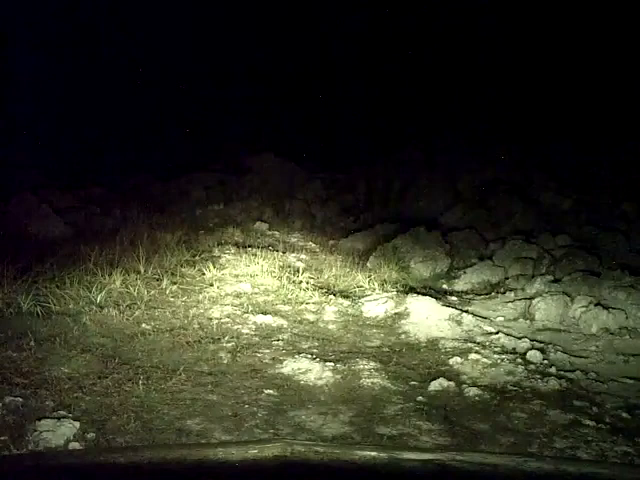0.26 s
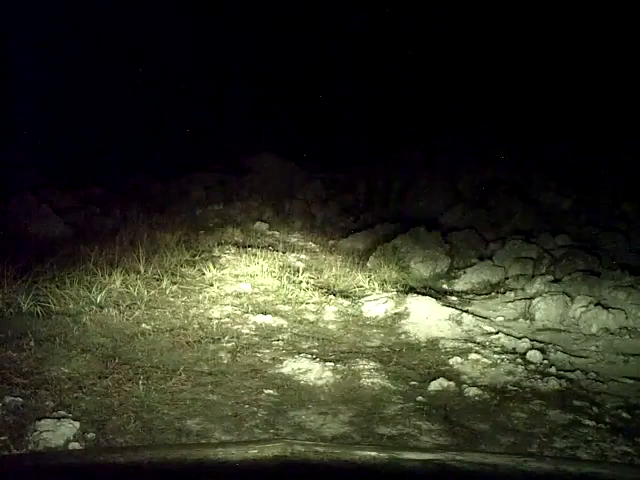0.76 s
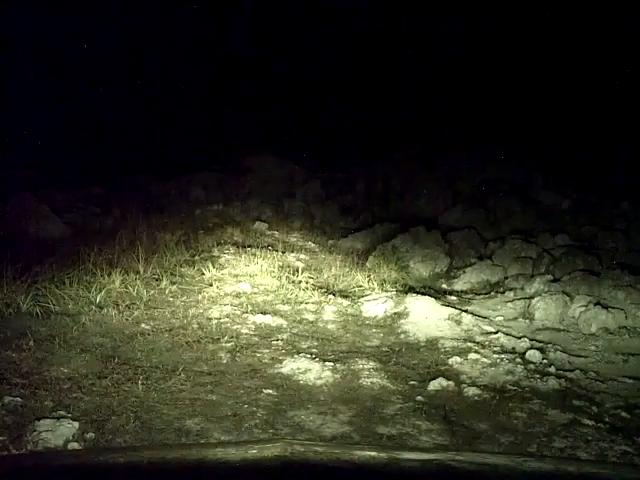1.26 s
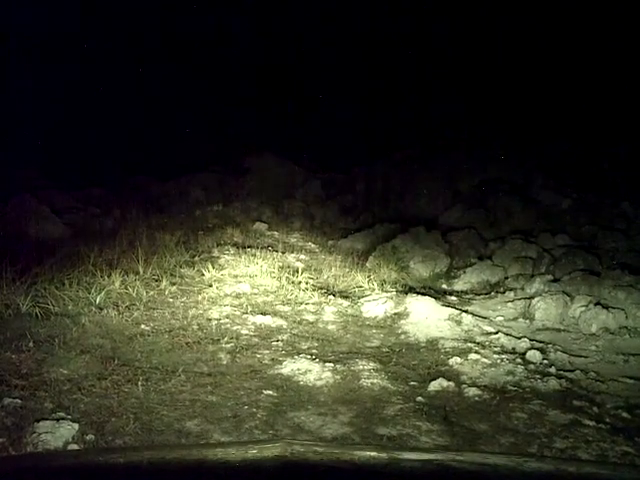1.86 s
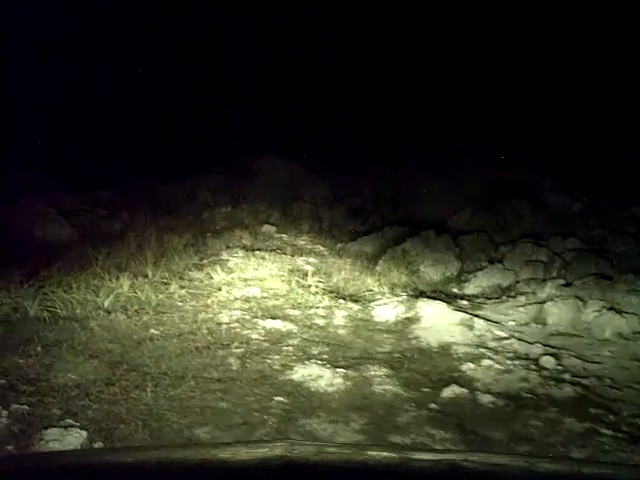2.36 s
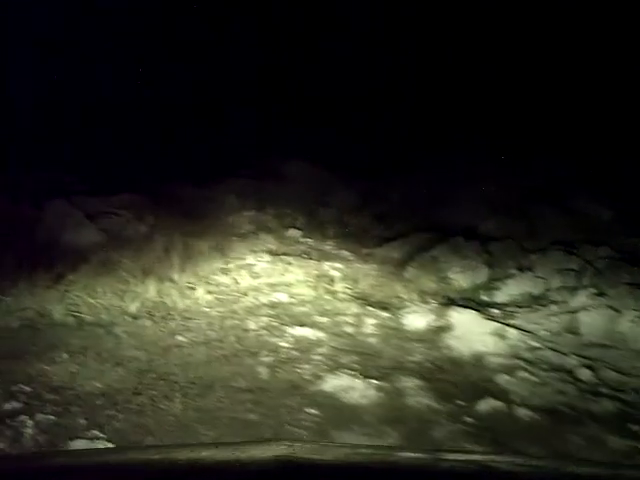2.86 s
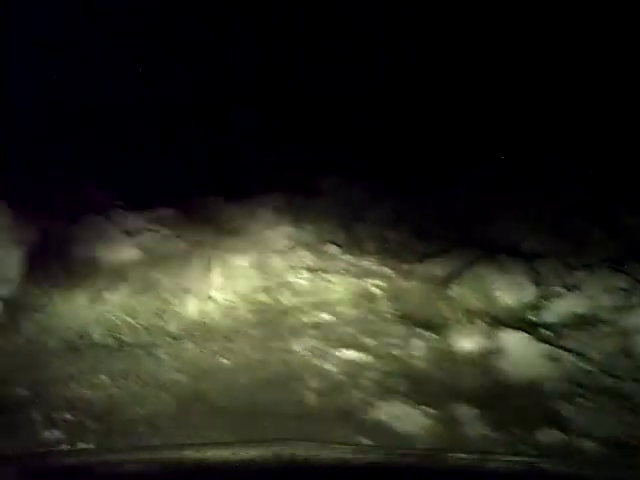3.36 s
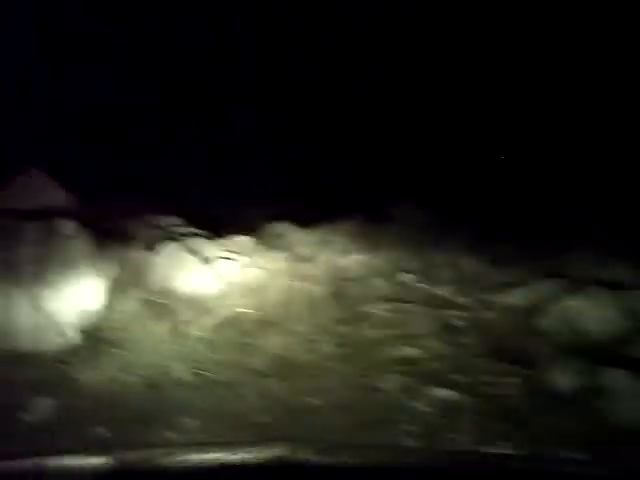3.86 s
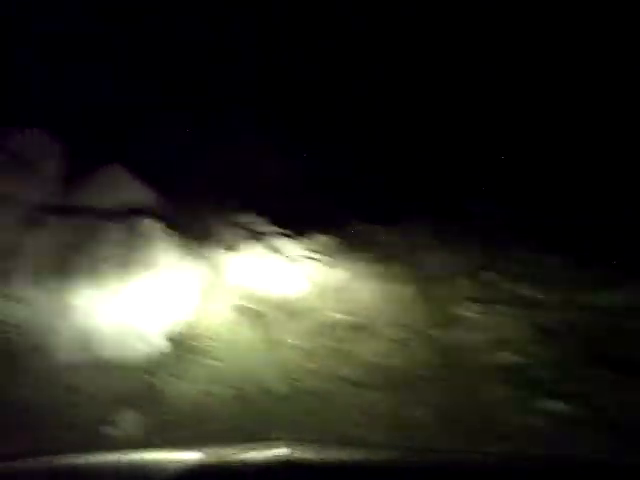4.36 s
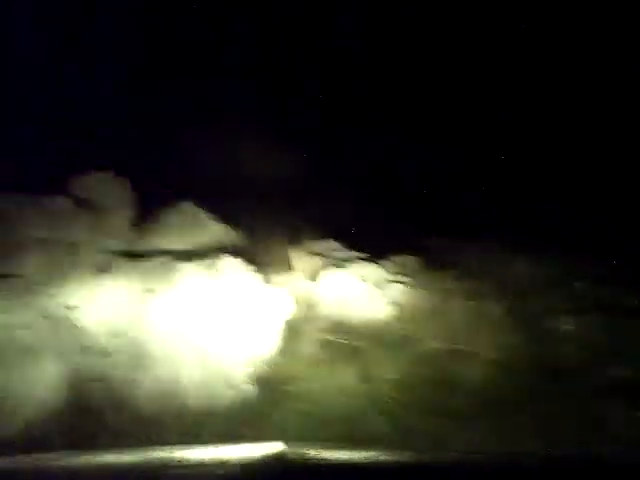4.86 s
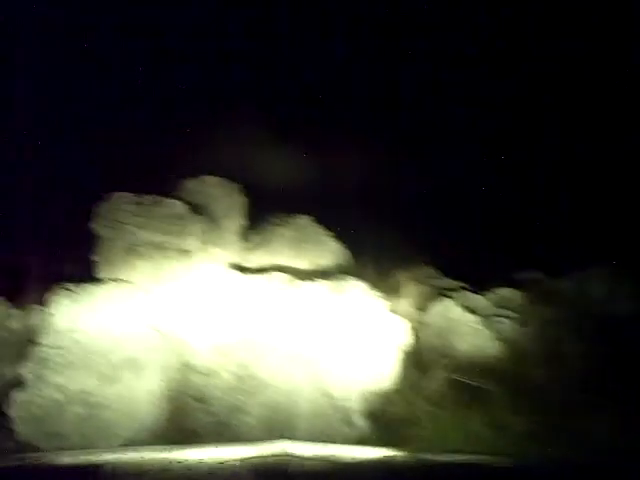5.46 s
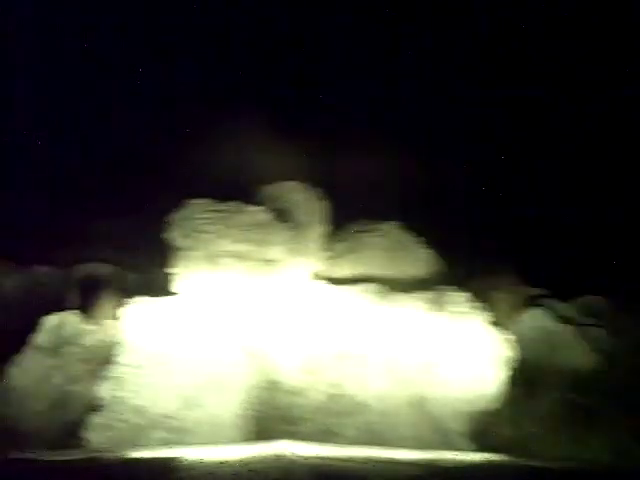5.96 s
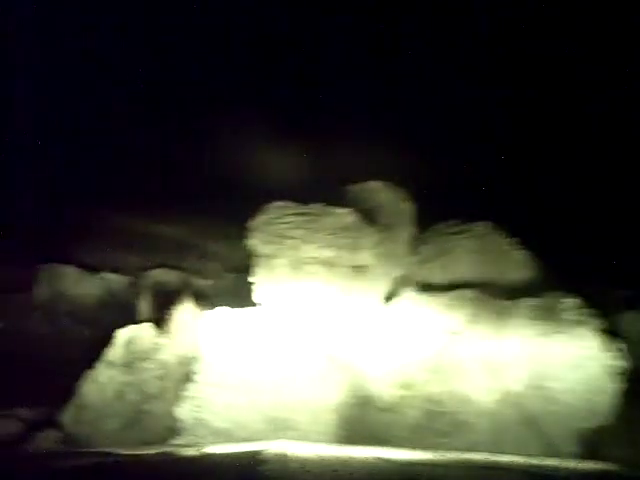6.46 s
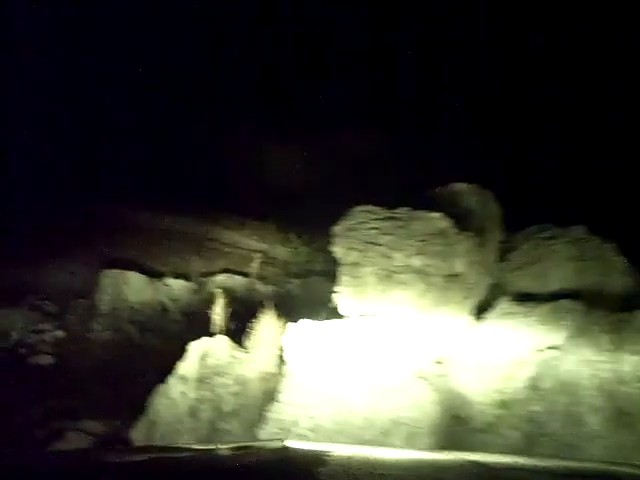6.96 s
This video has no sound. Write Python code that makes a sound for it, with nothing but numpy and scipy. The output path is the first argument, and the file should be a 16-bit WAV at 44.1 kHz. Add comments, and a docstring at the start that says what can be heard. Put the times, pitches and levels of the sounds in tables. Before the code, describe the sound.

A truck engine runs low inside the cab, pulls briefly, then crawls over rocks with thumps, stone knocks and crunching gravel.

```python
"""Inside the cab of a four-cylinder truck crawling over rocks at night.
At first the engine idles, insects call faintly outside and the driveline (the shafts to the wheels)
clunks. Then the engine pulls for two seconds and the cab booms, with short rubs and low groans.
It drops back to a crawl on rockier ground: the suspension thumps, stones knock and crunch under the
tyres, the trim ticks and the body rumbles. Just after five seconds comes one sharp click."""
import sys
import numpy as np
from scipy import signal
from scipy.fft import rfft, irfft
from scipy.io import wavfile
from scipy.ndimage import uniform_filter1d

SR = 44100
rng = np.random.default_rng(int(sys.argv[2]) if len(sys.argv) > 2 else 0)


def to_wav(sig):
    """Store sig (one row per channel, or 1-D mono) as 16-bit WAV at the path in sys.argv[1].

    Samples outside -1..1 are clipped; the rate is SR.
    """
    pcm = np.clip(np.atleast_2d(sig), -1, 1) * 32767
    pcm = np.round(pcm).astype(np.int16)
    wavfile.write(sys.argv[1], SR, pcm.T)  # frames by channels


N = 317520
TIME = np.arange(N) / SR
IDLE_PER_S, PULL_PER_S = 30.57, 44.4   # engine firings per second, idling and pulling
# the tone of the shaking cab: (frequency [Hz], relative level [dB])
RUMBLE = [(14, -12), (24, -1.5), (34, 0), (52, -8.5), (85, -7), (115, -21)]


def from_db(db):
    """Turn decibels into a number to multiply by."""
    return 10 ** (np.asarray(db) / 20)


def rms_one(x):
    """Scale a sound so that its average strength (rms) is 1."""
    return x / np.sqrt(np.mean(x ** 2) + 1e-20)


def drift(per_s):
    """A random wobble of strength 1 that heads for a new value per_s times a second."""
    targets = rng.standard_normal(2000)
    return rms_one(np.interp(TIME * per_s, np.arange(len(targets)), targets))


def band(x, low_hz, high_hz, order=2):
    """Keep the part of a sound between two frequencies."""
    sos = signal.butter(order, [low_hz, min(high_hz, .45 * SR)], "band", fs=SR, output="sos")
    return signal.sosfilt(sos, x + 1e-18)


def resonate(x, rows, order=2):
    """Pass a sound through resonances: narrow bands in which something likes to ring."""
    return sum(from_db(db) * band(x, hz - width / 2, hz + width / 2, order) for hz, width, db in rows)


def coloured(x, tone):
    """Shape a sound by a tone table, falling away steeply past its ends; strength 1."""
    hz, db = np.transpose(tone)
    octave, points = np.log2(np.arange(N // 2 + 1) * SR / N + 1), np.log2(hz)
    outside = np.abs(octave - np.clip(octave, points[0], points[-1]))
    gain = from_db(np.interp(octave, points, db) - 36 * outside)
    return rms_one(irfft(rfft(x) * gain, N))


def ring(blows, hz, t60):
    """Each blow starts a pure tone that fades by 60 dB in t60 seconds."""
    decay, turn = from_db(-60 / (t60 * SR)), 2 * np.pi * hz / SR
    return signal.lfilter([0, np.sin(turn)], [1, -2 * decay * np.cos(turn), decay * decay], blows + 1e-18)


def add(out, s, sound):
    """Mix a sound in, starting at s seconds."""
    start = max(round(s * SR), 0)
    out[start:start + len(sound)] += sound[:N - start]


def swells(rows, attack_s, release_s):
    """A loudness curve that rises to each event, holds for its length and dies away."""
    return sum(from_db(db) * np.exp(np.minimum(TIME - s, 0) / attack_s
                                    - np.maximum(TIME - s - length, 0) / release_s)
               for s, length, db in rows)


def impact(db, hz, octaves, t60, tail_db, ring_db, rise_s=.0009, grain_db=3, tail_t60=0.23, size=10000):
    """One contact: a quick crumble of tiny hits, a ring at its middle pitch and a short tail in the cab."""
    t = np.arange(size) / SR
    fade = (1 - np.exp(-t / rise_s)) * (from_db(-60 * t / t60) + from_db(tail_db - 60 * t / tail_t60))
    grains = from_db(grain_db * np.interp(t, t[::50], rng.standard_normal(len(t[::50]))))
    force = rng.standard_normal(size) * grains * fade
    crumble = band(force, hz / 2 ** octaves, hz * 2 ** octaves)
    hit = crumble + from_db(ring_db) * band(force, hz * .93, hz * 1.07)
    return from_db(db) * hit / np.abs(hit).max()


def hiss(level_db=-71):
    """A faint, steady, high hiss."""
    # its tone: (frequency [Hz], relative level [dB])
    tone = [(2500, -5.5), (4300, -7), (5400, -2.5), (7600, -6.5), (11000, -7)]
    return from_db(level_db) * coloured(rng.standard_normal(N), tone)


def insects(trill_hz=6130, pulses_per_s=37, chirp_hz=4050, fall_hz=300, chirp_s=0.04, gap_s=.068):
    """A fast, high trill that swells once, and a far cricket whose uneven chirps each sink in pitch."""
    # the cricket's groups of three chirps: (start [s])
    phrases = [0.059, 0.449, 1.06, 1.502]
    pulses = 0.55 + 0.36 * np.sin(2 * np.pi * pulses_per_s * TIME)
    wings = np.sin(2 * np.pi * trill_hz * TIME + 2 * drift(200))
    along = np.linspace(0, 1, int(chirp_s * SR))
    phase = 2 * np.pi * np.cumsum(chirp_hz - fall_hz * along) / SR
    chirp = from_db(-73) * np.sin(np.pi * along) * np.sin(phase)
    cricket = np.zeros(N)
    for s in phrases:
        for k in range(3):
            add(cricket, s + k * gap_s, chirp * rng.uniform(0.38, 1))
    loudness = from_db(-82) + swells([(6.3, 0.34, -76.5)], attack_s=.2, release_s=.12)
    return 2 * loudness * pulses * wings + cricket


def tyres(grit_per_s=500, loose_db=-77, rumble_db=-43, rocks_from_s=4.29, rocks_db=5, lump_db=1.2):
    """Rolling crushes grit into a fine crackle and shakes the cab, in lumps once the ground is rocky."""
    # patches of gravel: (start [s], length [s], level [dB])
    patches = [(1.8, 0.27, -71), (4.92, 0.63, -69.5), (6.85, 0.41, -69)]
    # the tone of crushed grit: (frequency [Hz], relative level [dB])
    tone = [(1700, -0.5), (2700, -0.5), (4000, -6.5), (6500, -2.5), (10500, -6.5)]
    breaks = rng.random(N) < grit_per_s / SR
    grit = rms_one(breaks * rng.standard_normal(N) * from_db(3 * np.minimum(rng.exponential(1, N), 3)))
    pressure = from_db(loose_db) + swells(patches, attack_s=0.11, release_s=0.27)
    crunch = pressure * coloured(rng.standard_normal(N) + from_db(1) * grit, tone)
    rocky = np.clip(TIME - rocks_from_s, 0, 1)
    shake = from_db(rumble_db + rocky * (rocks_db + lump_db * drift(10)))
    return crunch + shake * coloured(rng.standard_normal(N), RUMBLE)


def stones():
    """A stone gives a hollow, ringing knock and a dry crack; small grit and the cab's trim only tick."""
    # stones under the tyres: (time [s], knock peak [dB], knock pitch [Hz], crack peak [dB])
    knocks = [(.048, -38, 397, -55), (1.172, -44.5, 1100, -50), (2.239, -40, 720, -64),
              (3.677, -40.5, 520, -55), (3.899, -39, 650, -67), (3.954, -35, 480, -49),
              (4.298, -41, 830, -45.5), (4.599, -42, 720.6, -59), (4.677, -41.5, 726, -70),
              (4.828, -39, 630, -64), (4.856, -42, 804, -52), (4.973, -42, 588, -48.5),
              (4.997, -39, 376.5, -51), (5.097, -39.5, 655, -52), (5.146, -47, 1100, -48),
              (5.337, -41.5, 720, -58), (5.51, -46, 890, -46.5), (5.544, -45.5, 810, -36),
              (5.68, -39.5, 685, -51), (5.821, -36, 1100, -57), (5.829, -36, 880, -68),
              (5.956, -45, 662.7, -55.5), (6.075, -51, 1101, -46), (6.189, -37, 570.4, -46.5),
              (6.62, -45, 601.5, -50), (7.024, -44.5, 709, -62), (7.066, -36, 450, -55),
              (7.148, -44, 439.3, -38)]
    # grit and trim: (time [s], peak [dB], pitch [Hz], spread each side [octaves], fade time [s])
    ticks = [(1.1702, -46.5, 4250, 1.15, 0.057), (2.029, -51.5, 5130, .6, 0.061),
             (2.338, -51, 7450, .5, 0.17), (2.389, -51, 5500, 0.78, .05), (2.617, -48.5, 2803, 0.3, .035),
             (2.671, -48, 6970, 0.43, 0.12), (2.794, -49.5, 6200, 0.47, 0.092),
             (4.018, -49.5, 5700, .3, 0.032), (4.066, -48.5, 6200, 0.25, 0.026),
             (4.425, -54.5, 3160, 0.29, 0.2), (4.921, -55, 6300, .35, 0.064),
             (5.143, -41.5, 6286, 0.9, 0.14), (5.4218, -42.5, 5760, 0.74, 0.064),
             (5.447, -47.5, 6196, .5, 0.051), (5.526, -44, 3800, 0.86, 0.098),
             (5.544, -40, 5470, 0.39, 0.043), (5.972, -51.5, 6253, 0.62, 0.11),
             (6.767, -41, 4150, 0.72, 0.048)]
    out = np.zeros(N)
    for s, knock_db, knock_hz, crack_db in knocks:
        add(out, s, impact(knock_db, knock_hz, octaves=0.61, t60=0.057, tail_db=-23, ring_db=5))
        add(out, s, impact(crack_db, hz=2010, octaves=0.62, t60=0.071, tail_db=-19, ring_db=-15))
    for s, db, hz, octaves, t60 in ticks:
        add(out, s, impact(db, hz, octaves, t60, tail_db=-24.5, ring_db=-9))
    return out


def rub(rough_db=0.6, slips_per_s=90):
    """Rubbing parts grab and slip unevenly, and sing at two close pitches."""
    # short rubs as the truck pulls away: (start [s], length [s], level [dB])
    rubs = [(1.605, 0.099, -58), (1.91, 0.12, -62.5), (2.068, 0.038, -47.5), (2.19, 0.051, -60)]
    # the resonances they sing in: (pitch [Hz], width [Hz], relative level [dB])
    resonances = [(1247, 89, 1), (1336, 98, -0.5)]
    song = resonate(rng.standard_normal(N), resonances)
    pressure = swells(rubs, attack_s=0.055, release_s=0.035)
    return pressure * rms_one(song * from_db(rough_db * drift(slips_per_s)))


def groans():
    """Short low drones and groans swell as the engine pulls and slows, and near the end."""
    # the drones and groans: (start [s], length [s], level [dB], pitch [Hz])
    drones = [(2.125, 0.37, -41.5, 191), (2.28, 0.17, -51, 580), (3.62, 0.31, -55, 530),
              (3.946, .3, -41.5, 136), (6.8, 0.069, -58, 420), (7.115, 0.076, -49.5, 440)]
    return sum(swells([(s, length, db)], attack_s=0.046, release_s=0.095)
               * rms_one(band(rng.standard_normal(N), hz * .86, hz * 1.14))
               for s, length, db, hz in drones)


def clunk(soft_hz=700):
    """The driveline takes up its slack, ringing the floor through rubber mounts and rattling the trim."""
    # a light touch, then the full blow: (time [s], strength [dB])
    contacts = [(0.7933, -12), (0.8078, -1)]
    # the floor's ringing: (pitch [Hz], gain [dB], fade time [s])
    floor = [(159, -21.5, 0.081), (307, -31.5, 0.097), (363, -31.5, 0.11)]
    blows = np.zeros(N)
    for s, db in contacts:
        add(blows, s, from_db([db]))
    softened = signal.sosfilt(signal.butter(2, soft_hz, fs=SR, output="sos"), blows + 1e-18)
    out = sum(ring(softened, hz, t60) * from_db(db) for hz, db, t60 in floor)
    add(out, contacts[0][0], impact(db=-55.5, hz=2900, octaves=1, t60=0.15, tail_db=-10, ring_db=-10))
    return out


def heaves(low_hz=140, high_hz=360, shake_db=6):
    """Twisting over a rock, the body rumbles in its panels and shakes the whole cab."""
    # the twists: (start [s], length [s], panel level [dB])
    twists = [(4.98, 0.064, -45.5), (5.19, .05, -47), (5.68, .12, -48.5), (5.98, 0.071, -50),
              (6.8, 0.092, -48.5), (7.08, .12, -45.5)]
    panel_rumble = rms_one(band(rng.standard_normal(N), low_hz, high_hz))
    shake = from_db(shake_db) * coloured(rng.standard_normal(N), RUMBLE)
    return swells(twists, attack_s=0.053, release_s=0.051) * (panel_rumble + shake)


def thumps():
    """Each jolt shakes a different part of the body, softly and low."""
    # jolts of the suspension: (time [s], peak [dB], pitch [Hz])
    jolts = [(.04, -33, 228), (3.955, -26, 132), (5.765, -28.5, 179.1), (6.195, -35, 259.2),
             (6.45, -35, 221), (6.618, -33.5, 199), (6.675, -34.5, 152), (7.134, -31.5, 185)]
    out = np.zeros(N)
    for s, db, hz in jolts:
        add(out, s, impact(db, hz, octaves=0.36, t60=0.17, tail_db=-13, ring_db=-5, rise_s=0.0023))
    return out


def click(at_s=5.2525, peak_db=-17.5, t60=0.078):
    """One dry, sharp click: a sudden step that relaxes."""
    out = np.zeros(N)
    add(out, at_s, -from_db(peak_db - 60 * TIME / t60))
    return out


def speed_gain(speed):
    """How fast the engine speeds up, in firings per second gained each second."""
    return np.gradient(uniform_filter1d(speed, SR // 10)) * SR


def cycle_wave(firings, gains, size=8192):
    """A wave that repeats every four firings (one engine cycle); gains sets each overtone's strength."""
    tones = np.r_[0, gains * np.exp(2j * np.pi * rng.random(len(gains)))]
    cycle = irfft(tones, size) * size / np.sqrt(2)
    return np.interp(firings / 4 % 1, np.arange(size) / size, cycle)


def intake(firings, speed, multiple=8, level_db=-53):
    """The air intake gives a rough, rising moan while the engine speeds up."""
    effort = np.clip(speed_gain(speed) / 35, 0, 1) ** 2
    moan = np.sin(2 * np.pi * multiple * firings + 0.72 * drift(80))
    return from_db(level_db) * effort * rms_one(moan)


def engine_noise(firings, tone, repeat, throb_db=0.5, flutter_db=1.5):
    """A buzz that repeats each engine cycle, mixed with rushing noise; both swell with every firing."""
    # overtones differ in strength, and every other one tends to be weaker
    tones_db = np.tile([-7, 0], 200) + 3 * rng.standard_normal(400)
    uneven = firings + .022 * drift(45)   # uneven burning blurs the high overtones
    buzz = rms_one(cycle_wave(uneven, from_db(tones_db)))
    swell = from_db(throb_db * np.cos(2 * np.pi * firings) + flutter_db * drift(25))
    return coloured((repeat * buzz + rng.standard_normal(N)) * swell, tone)


def growl(firings, speed, idle_db=-45.5):
    """The engine's low growl gets louder with speed."""
    # its tone: (frequency [Hz], relative level [dB])
    tone = [(85, -2), (105, -6.5), (130, 0.5), (155, -4), (188, -0.5), (215, -6), (250, -4), (295, -10.5),
            (360, -12.5), (480, -25)]
    return from_db(idle_db + 0.47 * (speed - IDLE_PER_S)) * engine_noise(firings, tone, repeat=0.71)


def clatter(firings, speed, idle_db=-57):
    """The engine's moving parts clatter, louder with speed, and the cab's panels ring along."""
    # the clatter's tone: (frequency [Hz], relative level [dB])
    tone = [(390, 1.5), (500, 1), (600, 0), (800, -3), (970, -6.5), (1150, -7), (1380, -7), (1650, -14),
            (2400, -18.5), (4200, -28.5)]
    # the panels' resonances: (pitch [Hz], width [Hz], gain [dB])
    panels = [(788, 6.8, -4.5), (1128, 26, 0.5), (1247, 16, -3), (1700, 7.9, -3.5)]
    parts = engine_noise(firings, tone, repeat=0.41)
    ringing = resonate(parts, panels, order=1)
    return from_db(idle_db + 0.328 * (speed - IDLE_PER_S)) * rms_one(parts + ringing)


def overtones(firings, loaded):
    """Unequal cylinders add exhaust tones around the firing note, at quarter steps of its pitch."""
    # the tones: (pitch [times the firing rate], level at idle [dB], level under load [dB])
    tones = [(.5, -52, -39), (.75, -42, -46), (1.5, -49.5, -47.5), (2, -43.5, -51.5), (2.5, -47, -53.5),
             (3, -55.5, -51), (3.5, -57.5, -63)]
    multiple, idle_db, load_db = np.transpose(tones)
    step = np.round(4 * multiple).astype(int)
    gains = np.zeros(step.max())
    gains[step - 1] = from_db(load_db if loaded else idle_db)
    return cycle_wave(firings, gains)


def firing_note(firings, load, idle_db=-35, pull_db=-25, mount_hz=33.4, mount_width_hz=1.29, mount_db=20):
    """The firings make a deep note; under load the engine leans on its mounts and the cab booms."""
    level_db = idle_db + (pull_db - idle_db) * load + 1.8 * (1 - load) * drift(4.1)
    note = from_db(level_db) * np.sqrt(2) * np.sin(2 * np.pi * firings)
    # the note sweeps through the mount resonance, then throbs against its ringing
    return note + resonate(load * note, [(mount_hz, mount_width_hz, mount_db)], order=1)


def exhaust(firings, speed, throttle_lead_s=0.13, waver_db=3):
    """The firing note and its rough overtones, which shift with load and ring the air in the cab."""
    # resonances of that air: (pitch [Hz], width [Hz], gain [dB])
    cab_air = [(78.1, 11.2, -2.5), (128.24, 4.4, 8.5), (186, 18, 1.5)]
    gaining = speed_gain(speed)
    throttle = speed + throttle_lead_s * gaining   # the throttle runs ahead of the speed
    load = np.clip((throttle - IDLE_PER_S) / (PULL_PER_S - IDLE_PER_S), 0, 1)
    idle = (1 - load) * overtones(firings, loaded=False) * from_db(drift(22))
    pull = load * overtones(firings + .024 * drift(30), loaded=True) * from_db(waver_db * drift(24))
    tones = (idle + pull) * from_db(0.22 * np.maximum(gaining, 0))   # louder while speeding up
    return firing_note(firings, load) + tones + resonate(tones, cab_air)


def scene(treble_hz=10500):
    """Engine, body, ground and insects as heard in the cab; all but the click lose their top treble."""
    # engine speed: (time [s], speed [firings per s])
    speed_curve = [(0, 29.8), (1, 27.1), (1.38, 25.9), (1.6, 30.8), (1.77, 36.9), (1.94, 41.4),
                   (2.05, 43.6), (2.25, 45.5), (2.58, 43.8), (2.85, 42.6), (3.38, 44.7), (3.6, 43.8),
                   (3.88, 41.5), (4.17, 33.7), (4.5, 28.8), (5.5, 31.5), (5.9, 32.3), (6.4, 30),
                   (7.2, 27.8)]
    speed = np.interp(TIME, *np.transpose(speed_curve))
    firings = np.cumsum(speed) / SR + 0.0081 * drift(20)   # a running count, never quite evenly spaced
    machinery = growl(firings, speed) + clatter(firings, speed)
    background = hiss()
    engine = exhaust(firings, speed) + intake(firings, speed) + machinery
    body = rub() + groans() + clunk() + heaves() + thumps()
    cab = engine + body + tyres() + stones() + insects() + background
    dulled = signal.sosfilt(signal.butter(14, treble_hz, fs=SR, output="sos"), cab)
    return (dulled + click())[None]


def record(dry):
    """Cut away the very highest treble."""
    return signal.sosfilt(signal.butter(16, 16500, fs=SR, output="sos"), dry)


dry = scene()
out = record(dry)
to_wav(out)
```